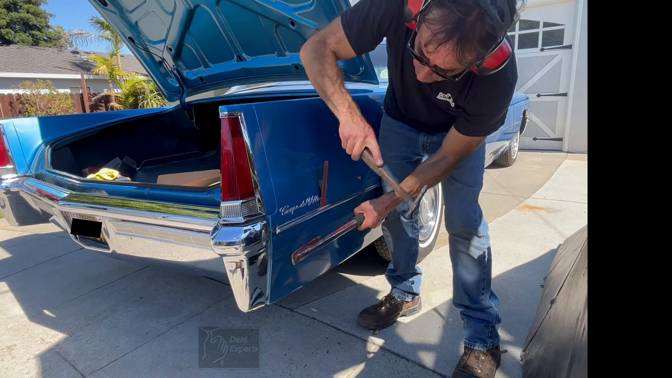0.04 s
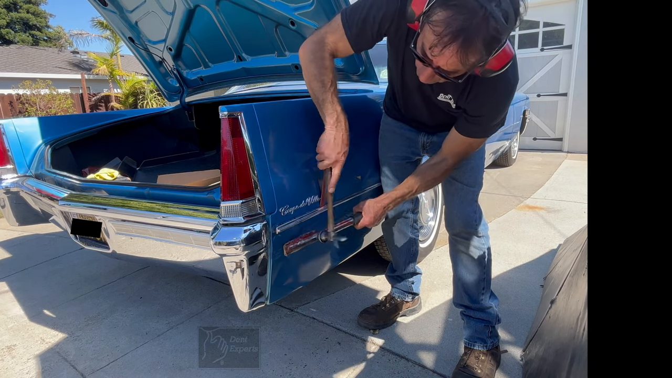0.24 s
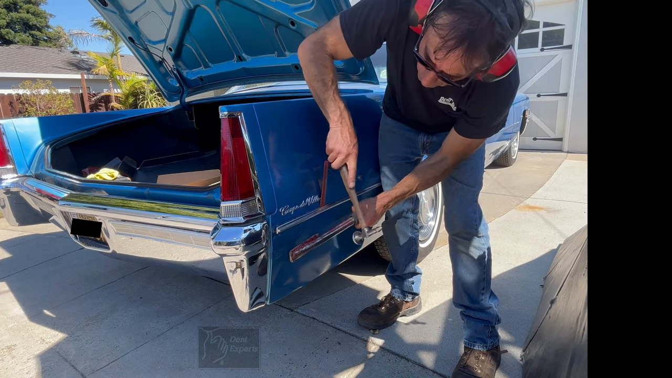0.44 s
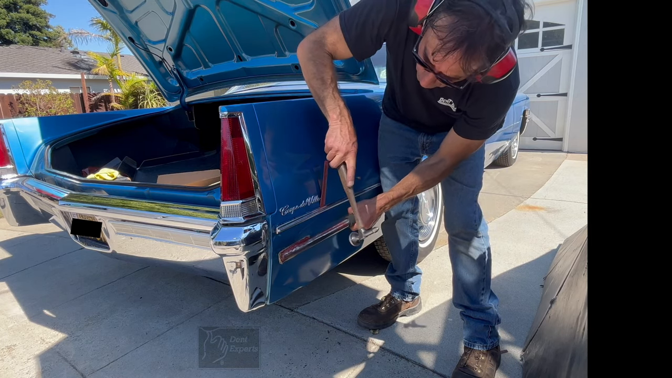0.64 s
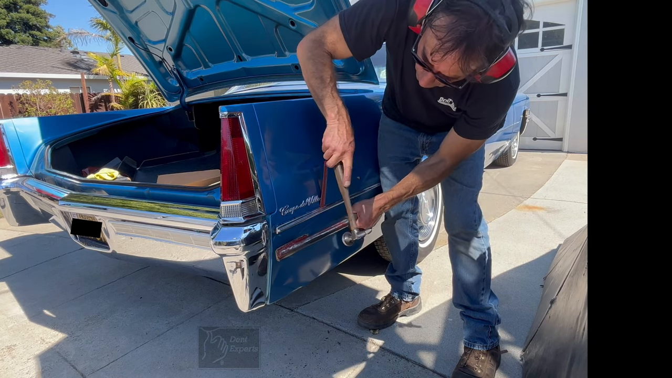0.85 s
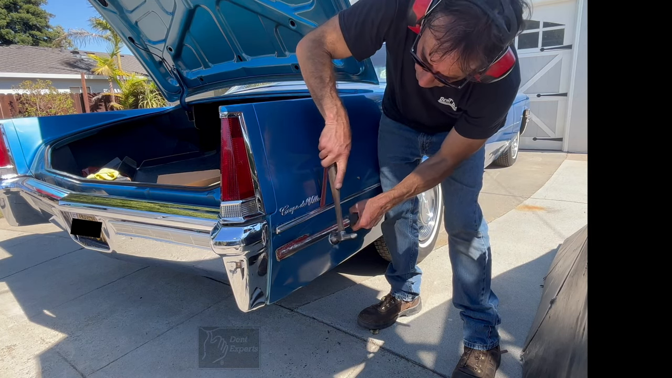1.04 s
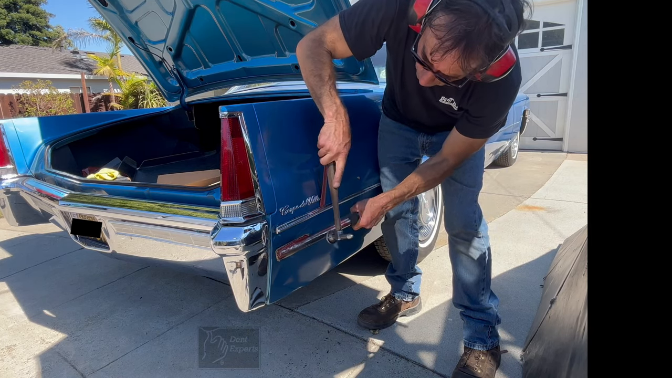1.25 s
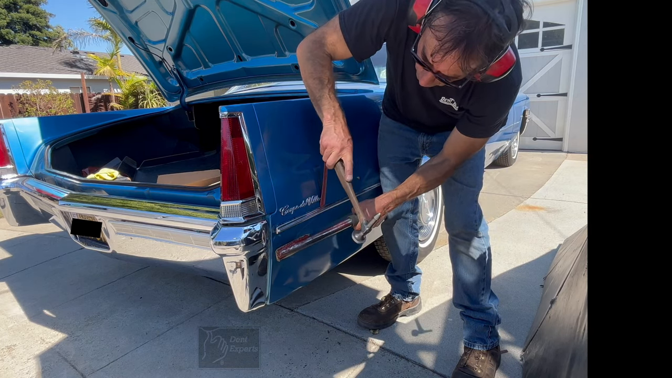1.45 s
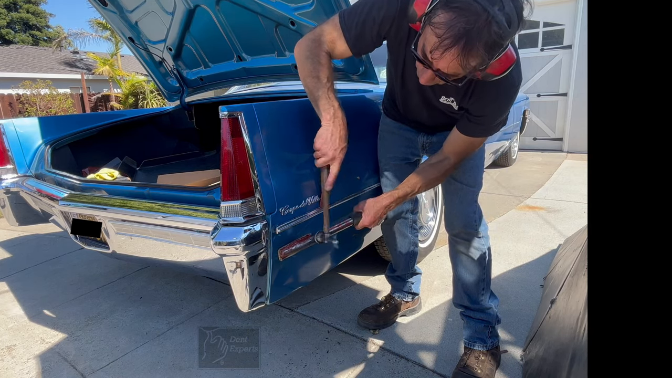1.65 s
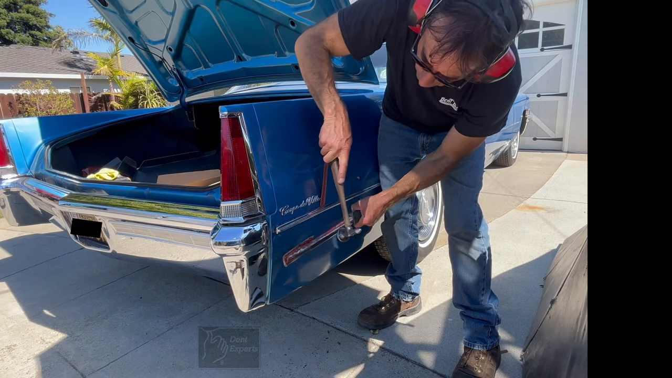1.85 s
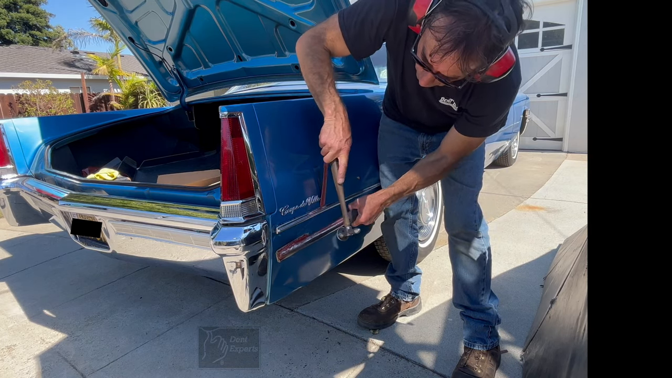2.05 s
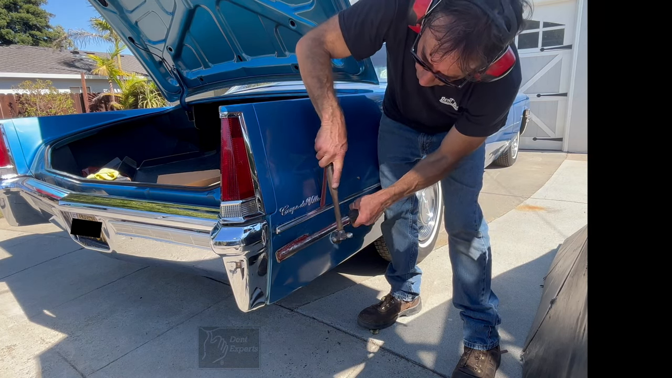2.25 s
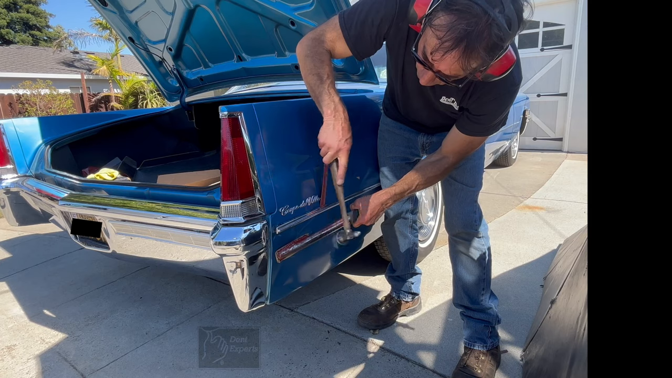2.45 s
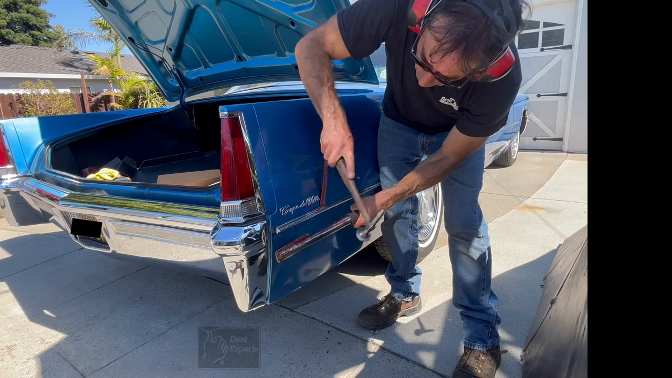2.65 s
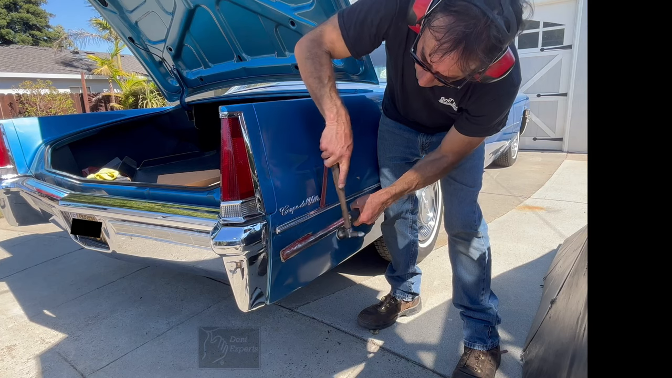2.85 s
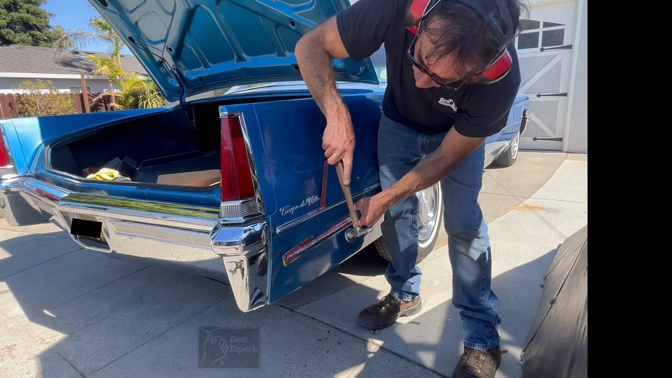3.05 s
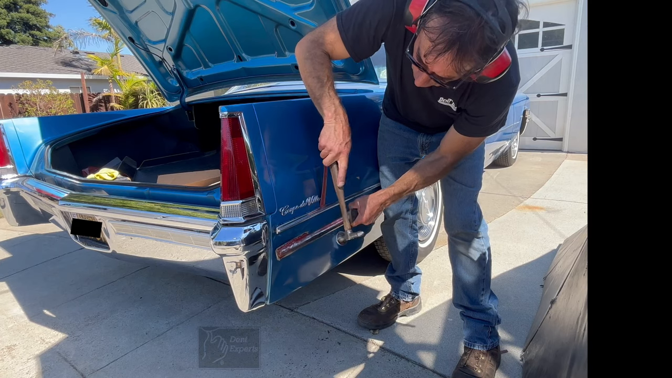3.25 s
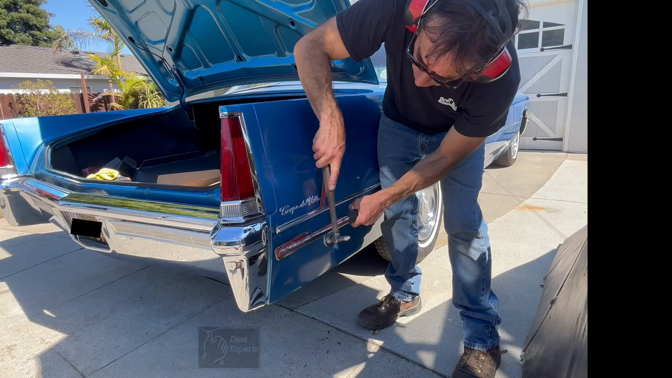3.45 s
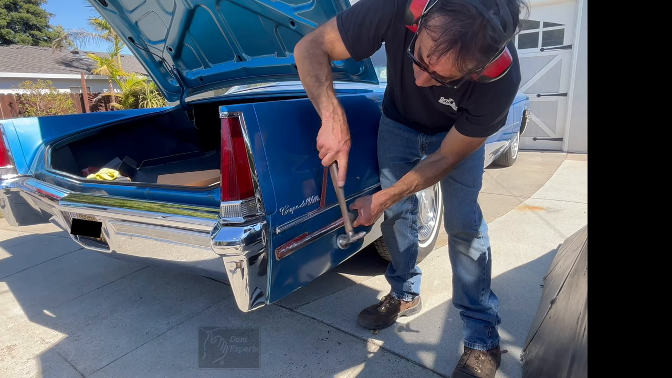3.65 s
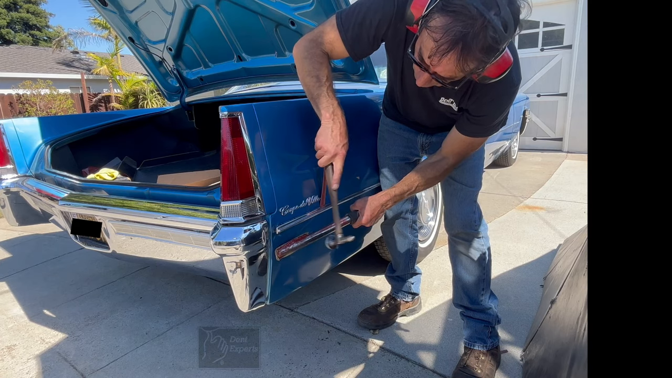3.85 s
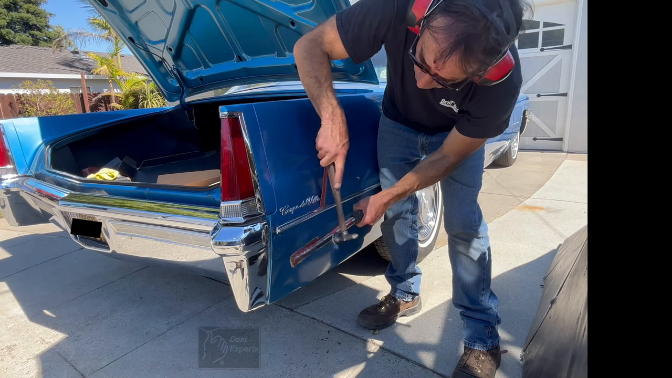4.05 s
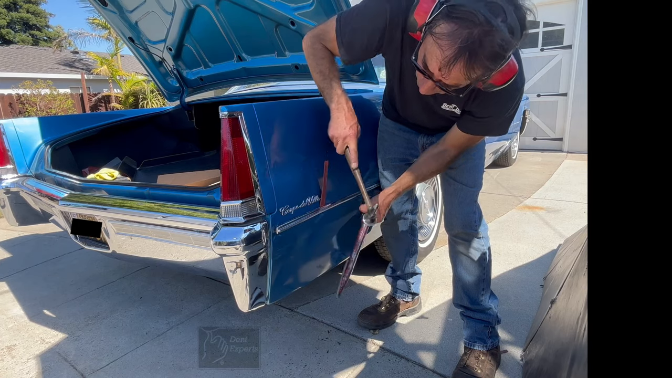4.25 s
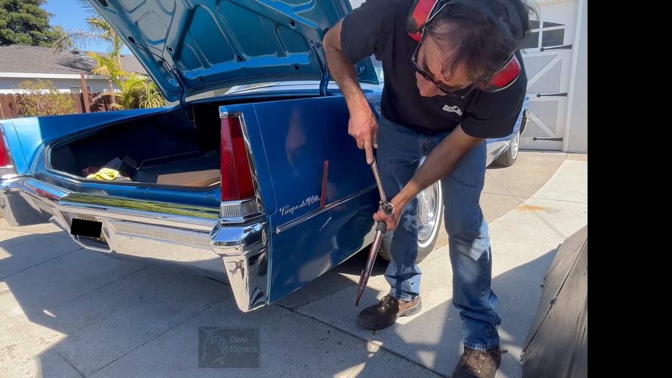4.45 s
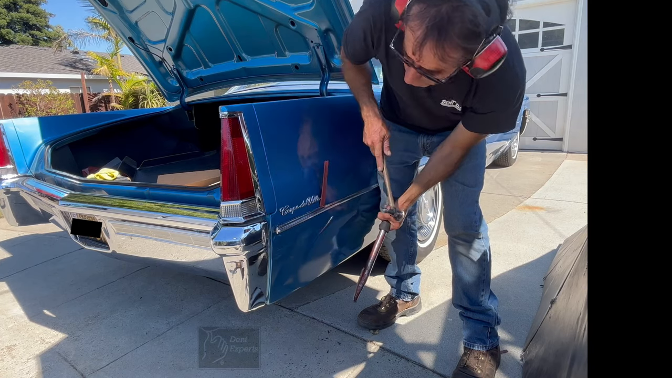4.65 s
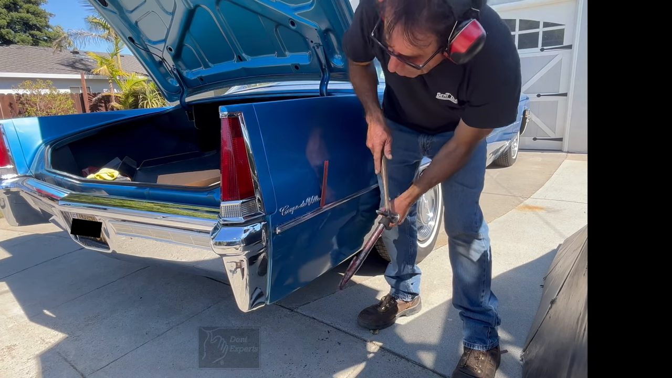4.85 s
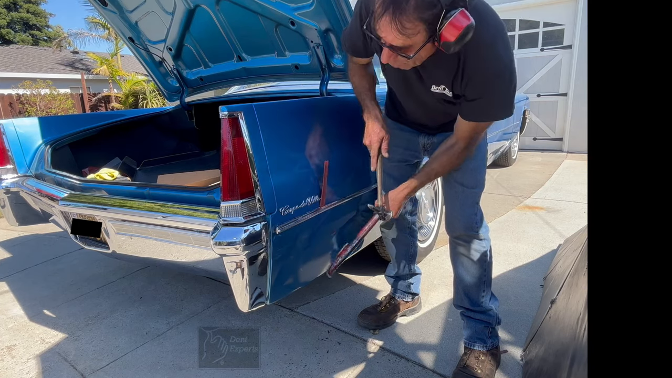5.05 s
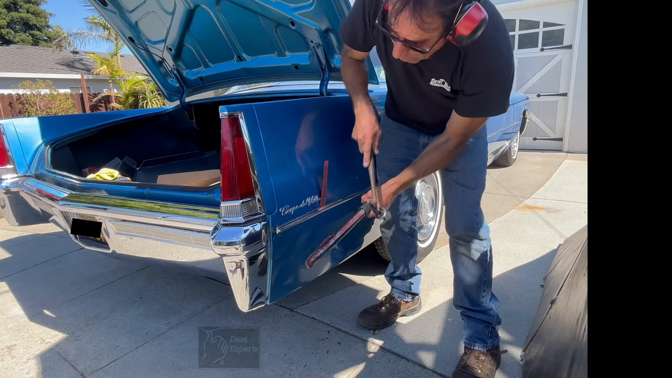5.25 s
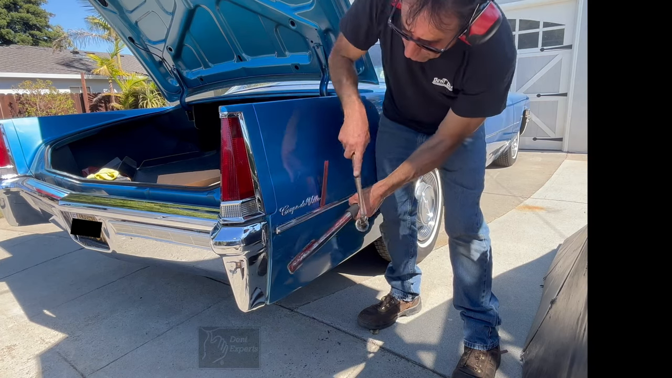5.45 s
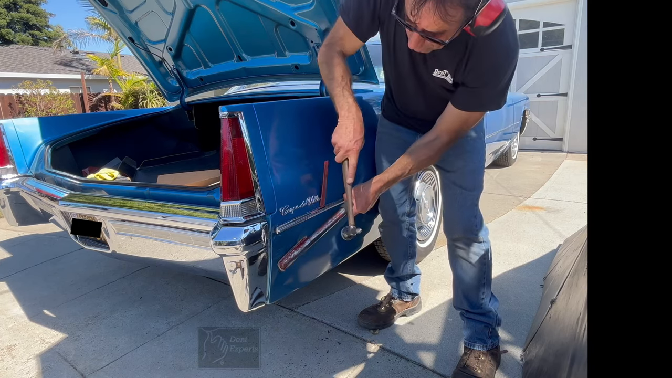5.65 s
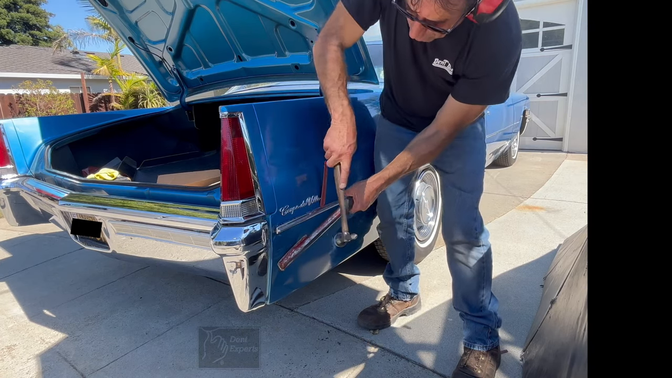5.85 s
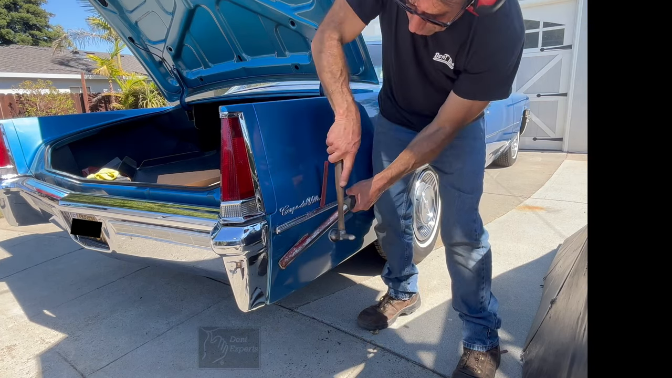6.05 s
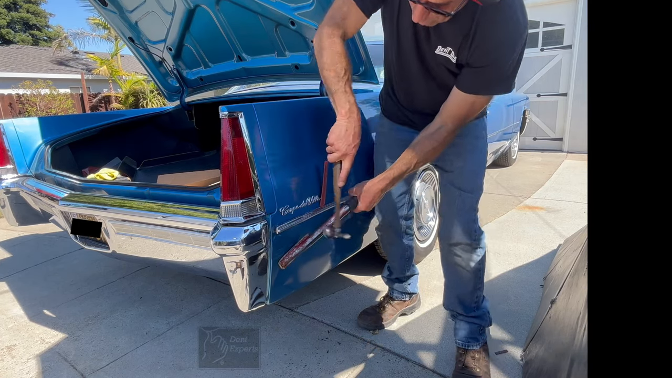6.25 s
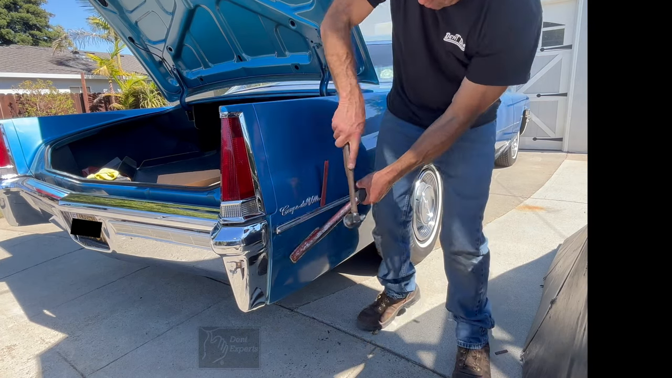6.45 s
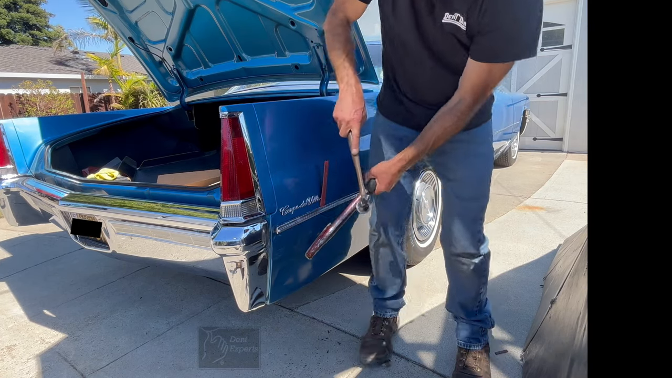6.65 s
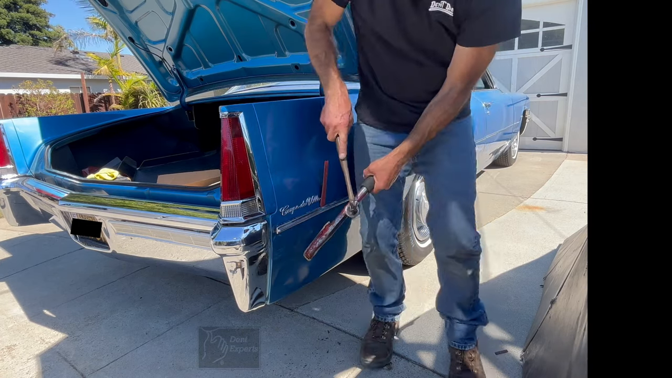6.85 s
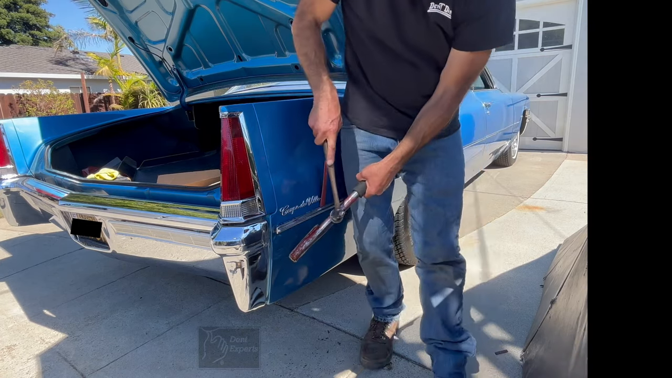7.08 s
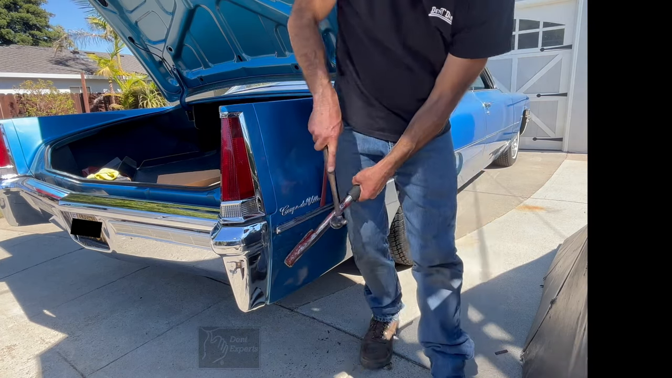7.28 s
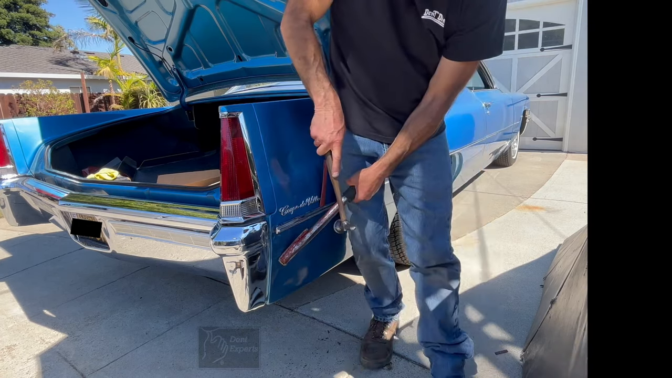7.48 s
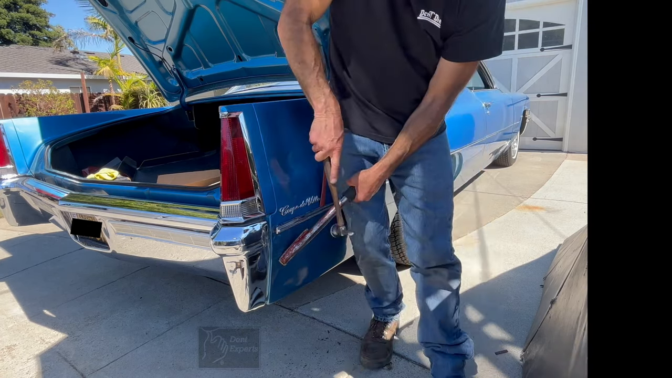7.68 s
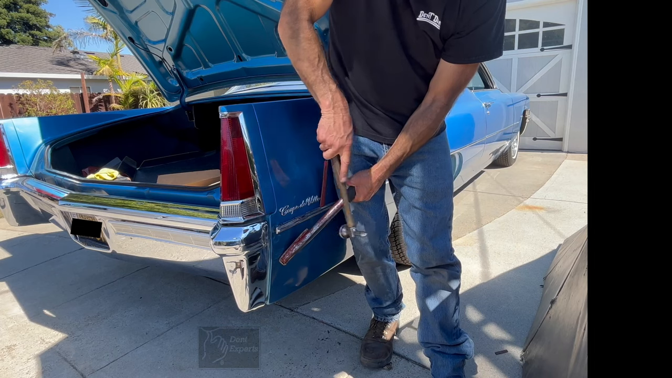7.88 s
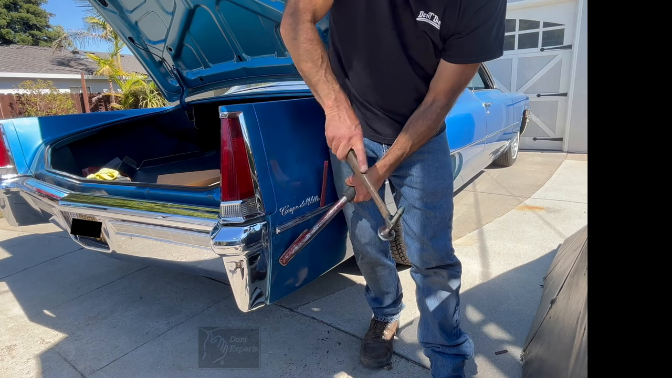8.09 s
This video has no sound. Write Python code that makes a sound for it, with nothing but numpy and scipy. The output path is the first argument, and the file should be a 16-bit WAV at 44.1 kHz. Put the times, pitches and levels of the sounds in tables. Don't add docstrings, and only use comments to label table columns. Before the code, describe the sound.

Uneven metallic hammering on a driveway: cracking, quickly choked pings, boomy sheet metal behind them, softer knocks between, faint traffic rumble.

```python
import sys
import numpy as np
from scipy import signal
from scipy.fft import rfft, irfft
from scipy.io import wavfile

SR = 44100
rng = np.random.default_rng(int(sys.argv[2]) if len(sys.argv) > 2 else 0)


def voltage_ratio(decibels):
    exponent = np.asarray(decibels, float) / 20
    return 10 ** exponent


def materialize(psi):
    bounded = np.clip(np.atleast_2d(psi).T, -1, 1)
    quanta = np.round(bounded * 32767).astype(np.int16)
    wavfile.write(sys.argv[1], SR, quanta)


N = 358091
LEAD = 13230
RING, SNAP = 11000, 2048


def at_hz(points, hz, column=1):
    points = np.array(points)
    return np.interp(np.log(hz), np.log(points[:, 0]), points[:, column])


def dying(t, t60):
    return np.exp(-np.log(1000) * t / t60)


def coloured(x, spectrum):
    hz = np.maximum(np.fft.rfftfreq(x.shape[-1], 1 / SR), 1)
    x = irfft(rfft(x) * voltage_ratio(at_hz(spectrum, hz)), x.shape[-1])
    return x / np.sqrt(np.mean(x ** 2))


def stereo(mid, side, alike):
    alike = np.clip(alike, -1, 1)
    shared, opposed = np.sqrt(1 + alike) * mid, np.sqrt(1 - alike) * side
    return np.array([shared + opposed, shared - opposed]) / np.sqrt(2)


def add(track, s, sound):
    at = round(s * SR) + LEAD
    room = min(sound.shape[-1], track.shape[-1] - at)
    track[:, at:at + room] += sound[:, :room]


# frequency in Hz, level in dB.
CRACK_COLOUR = [(300, -25.5), (700, 0), (1200, 3.5), (1900, -1.5), (3500, 0.5), (6000, 1.5), (8500, -10),
                (11000, -11.5), (13500, -2.5), (15500, -15), (17000, -43.5)]
CRACK_T60_S, PORT_LAG_S = 0.034, .00007


def crack(crack_db, rise):
    burst = coloured(stereo(*rng.standard_normal((2, SNAP)), alike=0.82), CRACK_COLOUR)
    burst[1] = np.roll(burst[1], round(PORT_LAG_S * SR))
    fade = dying(np.arange(SNAP) / SR, CRACK_T60_S)
    return voltage_ratio(crack_db + 8.5) * burst * rise[:SNAP] * fade


# start in seconds, crack level in dB, ping level in dB,
# spot along the bar from 0 to 1, push on the panel in dB.
BLOWS = [(-0.19, -19, -10, .165, -22.5), (0.2578, -17, -7.5, .14, -19), (1.1405, -23, -13, .255, -21),
         (1.5554, -16, -13.5, 0.5, -10.5), (2.3172, -21.5, -12.5, .07, -16.5),
         (2.7261, -18.5, -13, .048, -12.5), (3.513, -21.5, -13, .445, -14.5),
         (3.8890, -16.5, -9.5, 0.11, -14.5), (5.94, -17, -11.5, .33, -13.5), (6.2708, -18, -10.5, 1, -7.5),
         (7.7449, -20, -8.5, 1, -11.5)]
# start in seconds, crack level in dB, ping level in dB,
# spot along the bar from 0 to 1.
TICKS = [
    (0.157, -38, -38, 0.1),
    (0.2048, -65, -49, 0.37),
    (1.6106, -35.5, -30, .12),
    (1.8997, -76, -61, 0.77),
    (6.1934, -57.5, -67, 0.79),
    (6.5082, -52, -52, 0.6),
    (6.6794, -75.5, -65, 0.54),
    (7.0607, -52.5, -41, .23),
]
BAR_HZ = [2545, 4670, 5750, 6995, 8210, 9195, 9815, 4860, 2720]
# ping level in dB, after-ring level in dB, after-ring t60 in seconds.
BAR_MODES = [(4, -40, 0.18), (3.5, -38, .2), (9.5, -20.5, .3), (8, -11, .3), (-10.5, -31, .2),
             (-5.5, -37, 0.18), (-11, -29.5, .15), (0.5, -39, .15), (-2.5, -35, .25)]
FOLLOWS = [0, 1, 2, 3, 3, 1, 3, 1, 0]
PORT_TURN = [1.3, 1.3, 2.2, 1.2, 2.5, 2.8, 2.8, 1.5, 1.5]
# level at the belly in dB,
# half waves along the bar, start in half waves.
MODE_SHAPES = [(2.5, 0.38, 0.59), (-0.5, 0.56, 0.0045), (-13, 1.125, .03), (-16.5, .425, .5)]
USUAL_DB = [-10.5, -18.5, -31.5, -30]
PING_HOLD_S, PING_EDGE = .0048, 6
LINGER_DB, LINGER_T60_S = -20, .07
WAVER_HZ = 35


def bar():
    cracks, tones = np.zeros((2, 2, N + LEAD))
    t = np.arange(RING) / SR
    rise = 1 - np.exp(-t / .0008)
    ping = (1 - np.exp(-t / 0.001)) * np.exp(-(t / PING_HOLD_S) ** PING_EDGE)

    hz = np.array(BAR_HZ)[:, None]
    ping_db, after_db, t60 = np.transpose(BAR_MODES)[:, :, None]
    behind = np.outer([0, 1], PORT_TURN)[:, :, None]
    spin = np.exp(2j * np.pi * hz * t - 1j * behind)
    drift = np.cumsum(rng.standard_normal((len(BAR_MODES), RING)), axis=1)
    wavering = spin * np.exp(1j * np.sqrt(2 * np.pi * WAVER_HZ / SR) * drift)
    pings = voltage_ratio(ping_db) * ping * spin
    pings += voltage_ratio(ping_db + LINGER_DB) * rise * dying(t, LINGER_T60_S) * wavering
    rings = voltage_ratio(after_db) * rise * dying(t, t60) * wavering

    belly_db, waves, start = np.transpose(MODE_SHAPES)
    for s, crack_db, force_db, spot, *_ in BLOWS + TICKS:
        add(cracks, s, crack(crack_db, rise))
        bend = abs(np.sin(np.pi * (waves * spot + start)))
        mode_db = force_db + belly_db + 20 * np.log10(bend + 1e-3)
        turn, pan, loose = rng.standard_normal((3, len(BAR_MODES)))
        sides = np.where(hz[:, 0] < 3000, 2.0, -.5) + 1.5 * pan
        struck = voltage_ratio(mode_db[FOLLOWS] + sides * np.array([[-1], [1]])) * np.exp(3j * turn)
        spot_db = mode_db - USUAL_DB - (crack_db + 21)
        evened = voltage_ratio(1.5 * loose - 0.56 * spot_db[FOLLOWS])
        add(tones, s, np.einsum("cm,cmt->ct", struck, pings + evened[:, None] * rings).imag)
    return cracks, tones


# start in seconds, peak level in dB, bass share in dB,
# hardness in Hz.
KNOCKS = [(0.1571, -25, 7, 2300), (.205, -30, 2.5, 2160), (0.8275, -33.5, 8, 1618),
          (1.988, -47.5, 16.5, 1200), (3.3281, -31.5, 6.5, 1711), (5.6575, -32.5, 7, 1914),
          (6.677, -55.5, 9, 1876), (7.017, -56, -23, 2495), (7.0605, -43, -37, 3210),
          (7.402, -59, -5.5, 2490), (7.4694, -29.5, 6.5, 1956), (.229, -36, -6, 2000)]
PUSH_LAG_S, PUSH_HARD_HZ, PUSH_BUILD_S, PUSH_PAN_DB = .0006, 2300, .009, 1.5
PUSH_BASS_DB, BASS_LOSS_PER_DB, BASS_LOSS_ALONG_DB, USUAL_PUSH_DB = 2.5, 0.5, 5.5, -15.5
KNOCK_BUILD_S, KNOCK_PAN_DB, KNOCK_LIFT_DB = 0.0013, 0.94, 5.0
BOOT_DB, KNOCK_BOOT_DB = 9, -17


def pushes():
    felt = []
    for s, *_, spot, push_db in BLOWS:
        bass_db = PUSH_BASS_DB - BASS_LOSS_PER_DB * (push_db - USUAL_PUSH_DB) - BASS_LOSS_ALONG_DB * spot
        felt.append((s + PUSH_LAG_S, push_db, bass_db, PUSH_HARD_HZ, PUSH_BUILD_S, PUSH_PAN_DB, 0, BOOT_DB))
    for knock in KNOCKS:
        felt.append((*knock, KNOCK_BUILD_S, KNOCK_PAN_DB, KNOCK_LIFT_DB, KNOCK_BOOT_DB))
    return felt


BOOT_BAND_HZ = [720, 1150]
BOOT_LAG_S, BOOT_RIGHT_DB, BOOT_T60_S = .0152, -8.5, 0.059


def boot(boom, boot_db):
    t, lag = np.arange(RING) / SR, round(BOOT_LAG_S * SR)
    band = signal.butter(2, BOOT_BAND_HZ, "band", fs=SR, output="sos")
    middle = signal.sosfilt(band, boom.mean(axis=0))
    once = np.r_[np.zeros(lag), middle * dying(t, BOOT_T60_S)][:RING]
    twice = np.r_[np.zeros(lag), once][:RING]
    return voltage_ratio(boot_db + np.array([[0], [BOOT_RIGHT_DB]])) * (once + voltage_ratio(-11) * twice)


# frequency in Hz, level above their neighbours in dB, t60 in seconds.
STRONG_MODES = [(109.67, -1.5, 0.6), (141.2, 4.5, 0.34), (193, -1.5, 0.23), (328.4, 5, 0.13),
                (352.5, -0.5, 0.088), (469.3, 1, 0.13), (596, -0.5, 0.17), (738, 0.5, 0.13), (919, 7, 0.24),
                (1043, 7, 0.16), (1209, 3, 0.093)]
# frequency in Hz, level of a mode in dB.
PANEL_LEVEL = [(70, -16.5), (110, -13), (160, -4.5), (230, -8), (320, -1), (600, -2.5), (1000, -2.5),
               (1400, -6), (2500, -11), (6000, -17)]
# frequency in Hz, t60 in seconds.
PANEL_T60 = [(70, 0.39), (200, 0.15), (500, 0.11), (1100, 0.084), (2500, 0.096), (6000, 0.069)]
# frequency in Hz, likeness from -1 to 1.
PANEL_LIKENESS = [(70, .97), (200, .95), (400, .55), (800, .4), (1500, .45), (6000, .3)]
KNOCK_LIFT_HZ = 2000
DETUNE = .05


def panel(count=240):
    out = np.zeros((2, N + LEAD))
    t = np.arange(RING, dtype=np.float32) / SR
    strong = np.array(STRONG_MODES)
    dense = 70 + 6900 * ((np.arange(count) + rng.random(count)) / count) ** 2.2
    hz = np.r_[dense, strong[:, 0]]
    dense_t60 = at_hz(PANEL_T60, dense) * np.exp(.15 * rng.standard_normal(count))
    t60 = np.r_[dense_t60, strong[:, 2]]
    level = voltage_ratio(at_hz(PANEL_LEVEL, hz) + np.r_[np.zeros(count), strong[:, 1]])
    modes = np.exp(np.outer(2j * np.pi * hz - np.log(1000) / t60, t).astype(np.complex64))
    modes *= 1 - np.exp(-np.outer(hz / 1.7, t) ** 2).astype(np.float32)

    for s, peak_db, bass_db, hard_hz, build_s, pan_db, lift_db, boot_db in pushes():
        loudness = voltage_ratio(2.7 * rng.standard_normal((2, len(hz))))
        draw = loudness * np.exp(2j * np.pi * rng.random((2, len(hz))))
        bass = bass_db / (1 + (hz / 520) ** 4)
        lift = lift_db * np.exp(-(np.log(hz / KNOCK_LIFT_HZ) / 0.55) ** 2)
        contact = voltage_ratio(bass + lift) / np.sqrt(1 + (hz / hard_hz) ** 4)
        weights = stereo(*draw, at_hz(PANEL_LIKENESS, hz)) * level * contact
        weights = weights.astype(np.complex64)

        bent = t * np.exp(DETUNE * rng.standard_normal())
        dense_sound = (weights[:, :count] @ modes[:count]).real
        sheet = np.array([np.interp(bent, t, side) for side in dense_sound])
        boom = sheet + voltage_ratio(-lift_db) * (weights[:, count:] @ modes[count:]).real
        boom = boom * np.minimum((t[-1] - t) / .05, 1)
        swell = 1 - 0.52 * np.exp(-(t / max(build_s, .001)) ** 2)
        boom = boom * swell + boot(boom, boot_db)

        tap_colour = [(200, -20), (500, 0), (hard_hz, -3), (3.0 * hard_hz, -32), (20000, -70)]
        tap = coloured(stereo(*rng.standard_normal((2, SNAP)), alike=0.6), tap_colour)
        boom[:, :SNAP] += voltage_ratio(10.5) * tap * (dying(t, 0.027) * np.minimum(t / 0.00033, 1))[:SNAP]
        add(out, s, voltage_ratio(peak_db - 14.5 + pan_db * np.array([[.5], [-.5]])) * boom)
    return out


# frequency in Hz, near level in dB, near t60 in seconds,
# far level in dB, far t60 in seconds.
SCATTER = [(98.12, -38, .15, -43, 1), (194, -34.5, 0.05, -43.5, 1), (345, -31.5, 0.18, -40.5, .8),
           (1200, -39, 0.17, -53, .7), (2970, -26.5, 0.11, -54, 0.77), (7004, -28.5, 0.073, -47, 0.63),
           (13000, -31.5, .13, -61.5, 0.61), (16000, -48, .1, -72.5, .3)]
# delay in seconds, level in dB, smear in seconds.
ECHOES = [
    (0.019, -30.5, 0.0039),
    (0.032, -31, 0.0028),
    (.137, -40, .005),
    (0.181, -49, 0.0084),
    (0.329, -58, 0.019),
]
PING_SCATTER_DB = -9.5
PING_FAR_DB = -3


def yard(body, tones):
    t = np.arange(SR) / SR
    near, far = np.zeros((2, 2, SR))
    mid, side = rng.standard_normal((2, 2, SR))
    edges = 70 * 2 ** np.arange(0, 8.1, .5)
    for k, (low, high) in enumerate(zip(edges, edges[1:])):
        white = stereo(mid[k % 2], side[k % 2], at_hz(PANEL_LIKENESS, low))
        band = signal.sosfilt(signal.butter(2, [low, high], "band", fs=SR, output="sos"), white)
        centre = np.sqrt(low * high)
        near_db, near_t60, far_db, far_t60 = [at_hz(SCATTER, centre, column=c) for c in range(1, 5)]
        near += band * voltage_ratio(near_db) * dying(t, near_t60)
        far += band * voltage_ratio(far_db) * dying(t, far_t60)
    near *= 1 - np.exp(-t / 0.00033)

    dull = signal.sosfilt(signal.butter(4, 8500, fs=SR, output="sos"), mid[:, ::-1])
    for delay, echo_db, spread_s in ECHOES:
        fade = (t >= delay) * np.exp(-np.maximum(t - delay, 0) / spread_s)
        near += voltage_ratio(echo_db - 10.5) * dull * fade
    nearby = signal.fftconvolve(body + voltage_ratio(PING_SCATTER_DB) * tones, near, axes=1)
    houses = signal.fftconvolve(body + voltage_ratio(PING_FAR_DB) * tones, far, axes=1)
    return (nearby + houses)[:, :N + LEAD]


# frequency in Hz, level in dB per Hz.
TRAFFIC_COLOUR = [(20, -27.5), (35, -11), (65, 3.5), (120, -4), (250, -16), (500, -20.5), (1000, -22.5),
                  (2000, -30), (4000, -32.5), (8000, -43), (14000, -54.5), (16500, -73)]
# frequency in Hz, likeness from -1 to 1.
TRAFFIC_LIKENESS = [(60, 0.65), (130, 0.9), (290, 1), (640, -0.4), (1410, -0.5), (3100, 0.3), (6820, 0.19),
                    (15000, -0.48)]
# time in seconds, level in dB.
TRAFFIC_LEVEL = [(0, -51.5), (2.0, -57.5), (4.002, -51.5), (4.7, -55.5), (5.5, -56.5), (6.999, -55),
                 (8.12, -55.5)]


def traffic():
    mid, side = rfft(rng.standard_normal((2, N)))
    hz = np.maximum(np.fft.rfftfreq(N, 1 / SR), 1)
    noise = coloured(irfft(stereo(mid, side, at_hz(TRAFFIC_LIKENESS, hz)), N), TRAFFIC_COLOUR)
    s, level_db = np.transpose(TRAFFIC_LEVEL)
    return noise * voltage_ratio(np.interp(np.arange(N) / SR, s, level_db) + np.array([[1.5], [0.3]]))


def scene():
    cracks, tones = bar()
    body = cracks + panel()
    return (body + tones + yard(body, tones))[:, LEAD:] + traffic()


BLOCK, BLOCK_START = 1024, 65
SMEAR_DB, SMEAR_LATE_LOSS_DB = -17.5, 11
SMEAR_RIGHT_DB = 7.5
SMEAR_TONE, ATTACK_S = .7, .008


def smear(x):
    out = x.copy()
    before = np.arange(-SNAP, 0) / SR
    hz = np.fft.rfftfreq(SNAP, 1 / SR)
    swell = voltage_ratio(750 * (before + .006)) * np.clip((before + .024) / .008, 0, 1)
    for s, *_ in BLOWS[1:]:
        at = round(s * SR)
        late = (at - BLOCK_START) % BLOCK / BLOCK
        attack = rfft(x[:, at:at + round(ATTACK_S * SR)], SNAP) * (hz > 1000) * (hz < 8000)
        size = np.sqrt(np.mean(abs(attack) ** 2, axis=1, keepdims=True) / (ATTACK_S * SR))
        patchy = np.repeat(voltage_ratio(9.0 * rng.standard_normal((2, 65))), 16, axis=1)[:, :len(hz)]
        scrambled = np.exp(2j * np.pi * rng.random(attack.shape))
        blur = irfft(abs(attack) ** SMEAR_TONE * patchy * scrambled, SNAP)
        blur /= blur[:, -SNAP // 4:].std(axis=1, keepdims=True)
        blur_db = SMEAR_DB - SMEAR_LATE_LOSS_DB * late + SMEAR_RIGHT_DB * np.array([[-1], [0]])
        out[:, at - SNAP:at] += voltage_ratio(blur_db) * size * swell * blur
    return out


def band_limit(x):
    return signal.sosfilt(signal.butter(12, 16840, fs=SR, output="sos"), x)


def record(dry):
    rounded = 0.79 * np.tanh(dry / 0.84)
    top_cut = signal.butter(8, 15800, fs=SR, output="sos")
    mix = signal.sosfilt(top_cut, smear(rounded))
    return band_limit(mix)


dry = scene()
out = record(dry)
materialize(out)
```